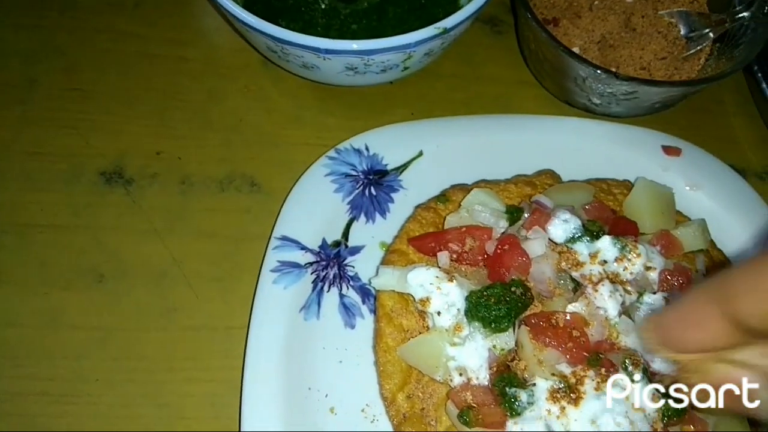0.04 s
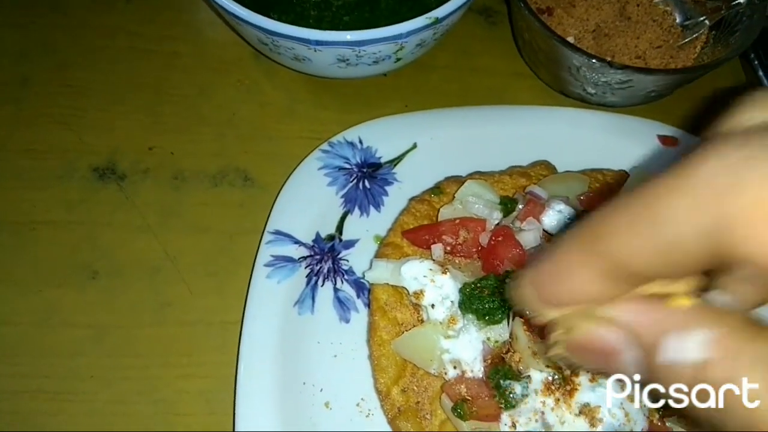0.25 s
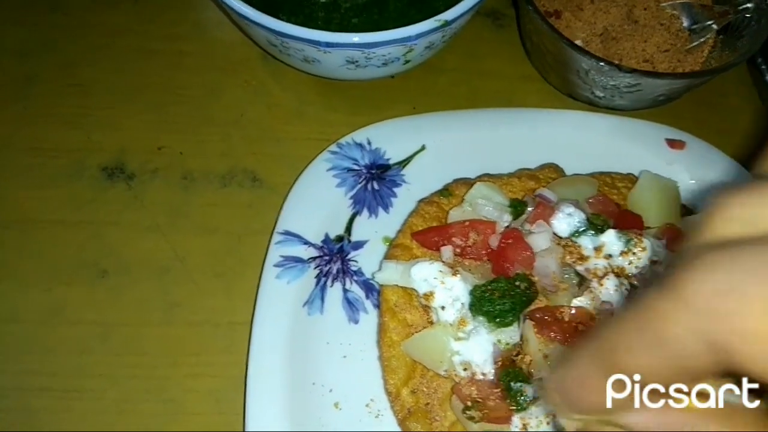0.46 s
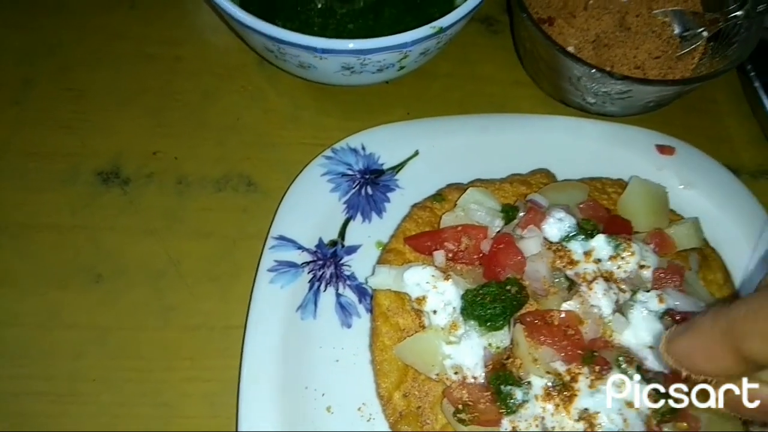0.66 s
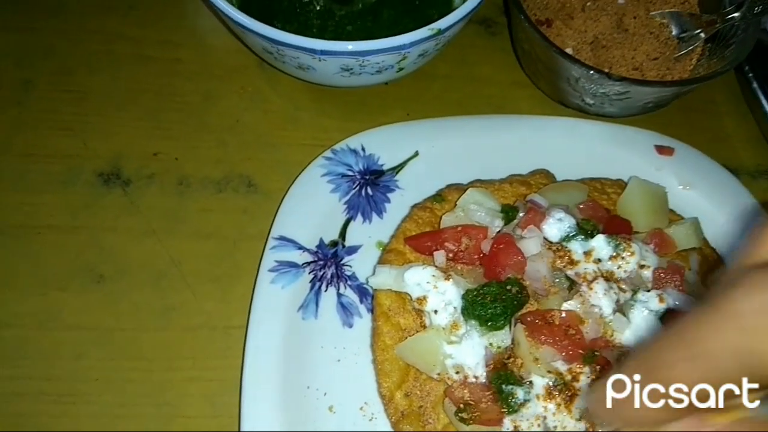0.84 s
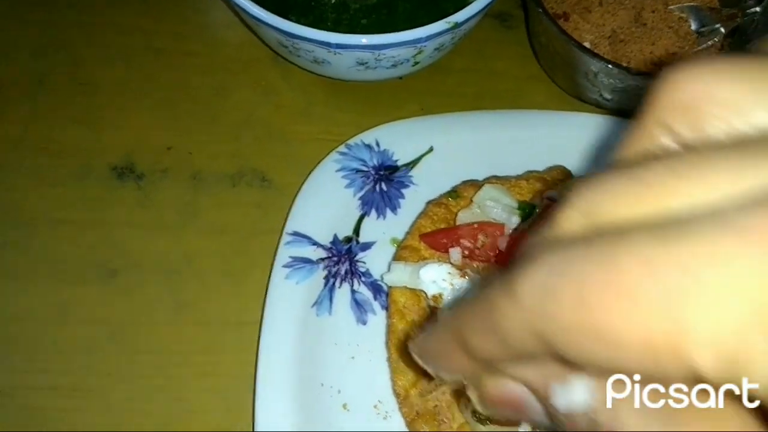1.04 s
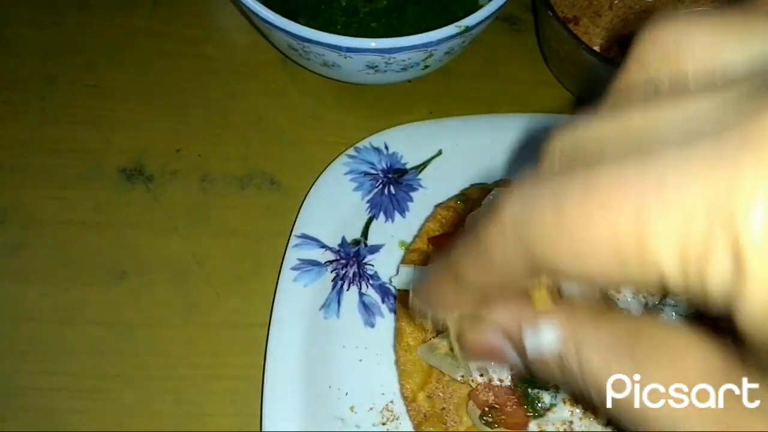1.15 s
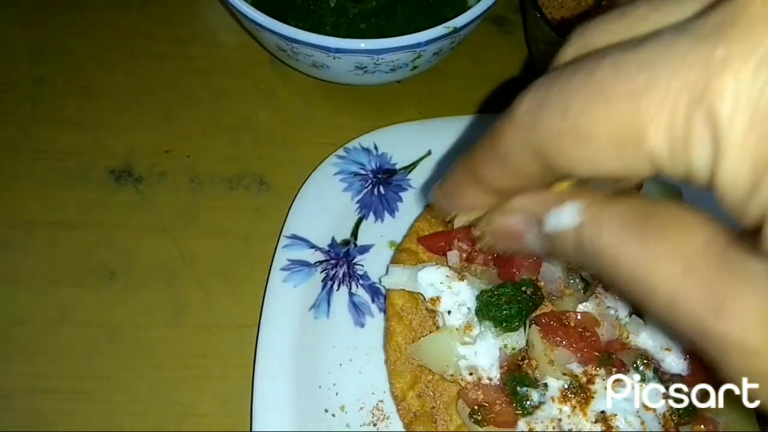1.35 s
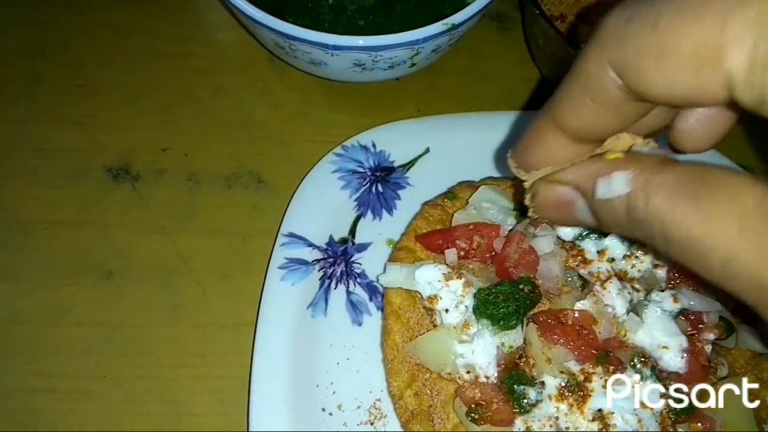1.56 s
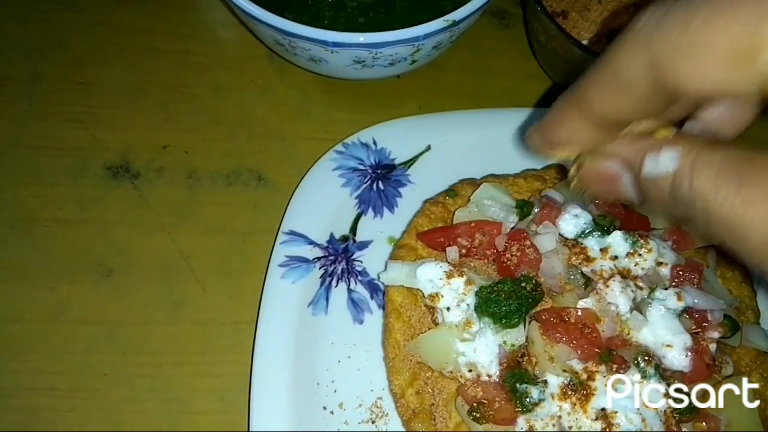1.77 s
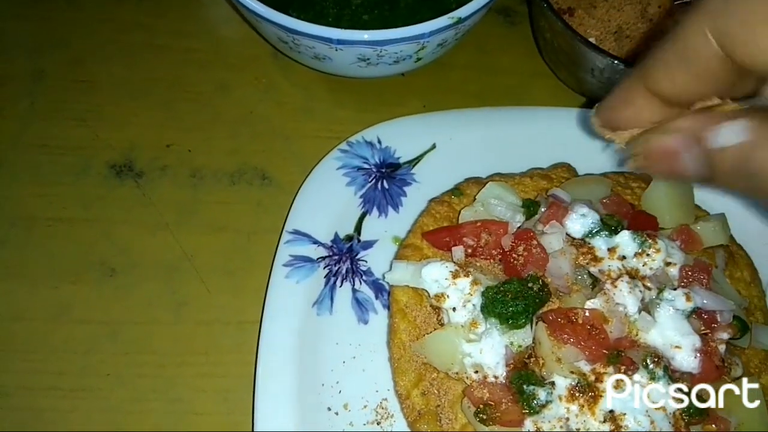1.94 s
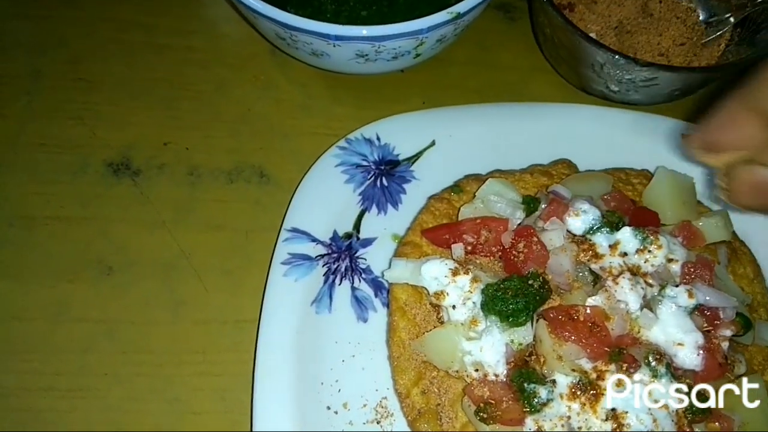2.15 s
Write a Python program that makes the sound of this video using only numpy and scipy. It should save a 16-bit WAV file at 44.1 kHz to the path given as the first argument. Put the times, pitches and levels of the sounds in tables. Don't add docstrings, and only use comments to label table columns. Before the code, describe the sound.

Close stereo phone pickup of spice being pinched and sprinkled, brighter on the right; a loud brittle crumble comes first, then light scrapes and powdery hisses, with faint hand puffs, dull knocks and quiet room tone.

```python
import sys
import numpy as np
from scipy import signal
from scipy.fft import rfft, irfft, next_fast_len
from scipy.io import wavfile
from scipy.ndimage import uniform_filter1d

SR = 44100
rng = np.random.default_rng(int(sys.argv[2]) if len(sys.argv) > 2 else 0)


def generate_wav(signal):
    frames = np.transpose(np.atleast_2d(signal))
    scaled = np.clip(frames, -1, 1) * 32767
    pcm = np.round(scaled).astype(np.int16)
    wavfile.write(sys.argv[1], SR, pcm)


def field_ratio(decibels):
    return 10 ** (np.asarray(decibels, dtype=float) / 20)


N = 97020

# frequency in Hz, level in dB per Hz.
KITCHEN_TONE = [(45, -17), (190, 1), (370, -5), (490, -16), (1000, -14), (2500, -28), (5000, -36),
                (9000, -35)]
KITCHEN_DB, KITCHEN_LEFT_DB, KITCHEN_SHARED, KITCHEN_SWELL_DB = -59, -12, .9, 1.5

# frequency in Hz, level in dB per Hz.
BREEZE_TONE = [(15, -44), (35, -22), (56, 0), (100, -5), (200, -30)]
BREEZE_DB, BREEZE_GUST_DB = -70, 2.5

# centre in seconds, peak in dB, frequency in Hz, length in seconds.
LEFT_PUFFS = [(0.022, -49, 60, 0.011), (0.051, -33, 70, 0.019), (0.29, -52, 94, 0.01),
              (0.687, -36, 84, 0.013), (0.728, -33, 97, 0.013), (0.763, -46, 65, 0.013),
              (0.803, -44, 66, 0.02), (0.825, -52, 80, 0.008), (0.921, -46, 67, 0.026),
              (0.952, -52, 79, 0.007), (0.998, -35, 63, 0.025), (1.019, -46, 51, 0.005),
              (1.686, -47, 55, 0.028), (1.707, -49, 61, 0.006), (1.927, -53, 86, 0.013),
              (2.037, -40, 63, 0.022)]
# centre in seconds, peak in dB, frequency in Hz, length in seconds.
RIGHT_PUFFS = [(0.107, -44, 79, 0.024), (0.143, -46, 65, 0.018), (0.17, -49, 56, 0.024),
               (0.291, -41, 68, 0.066), (0.315, -42, 64, 0.014), (0.342, -43, 64, 0.004),
               (0.622, -50, 104, 0.024), (0.669, -35, 71, 0.014), (0.691, -44, 62, 0.008),
               (0.706, -41, 60, 0.012), (0.747, -45, 79, 0.014), (0.957, -39, 71, 0.012),
               (0.999, -36, 65, 0.02), (1.041, -50, 66, 0.007), (1.077, -50, 78, 0.012),
               (1.292, -50, 93, 0.015), (2.175, -50, 77, 0.018)]

# peak in seconds, level in dB, 20 dB rise in seconds,
# 20 dB fall in seconds, centre in Hz.
FINGER_RUBS = [(.03, -62, .1, .08, 9000), (.2, -46, .07, .09, 12000), (.43, -46, .14, .06, 10500),
               (.56, -62, .08, .05, 9000), (.69, -60, .015, .1, 7500), (.782, -46, .02, .015, 10000),
               (.83, -61, .05, .1, 8000), (1.026, -53, .02, .03, 13000), (1.195, -38, .09, .07, 9000),
               (1.325, -41, .06, .12, 11000), (1.4, -43, .1, .055, 10500), (1.59, -49, .045, .03, 13000),
               (1.755, -52, .008, .12, 10000), (1.792, -33, .012, .01, 10000), (1.85, -47, .1, .1, 10500),
               (1.895, -46, .04, .05, 11000), (2.1, -58, .04, .1, 6000), (2.178, -38, .016, .025, 11500)]
RUB_OCTAVES, RUB_GRAIN_DB, RUB_FLUTTER_DB = .55, 2.2, 2.2
RUB_BODY_HZ, RUB_BODY_OCTAVES, RUB_BODY_DB = 3400, .8, -13

# peak in seconds, level in dB, 20 dB rise in seconds,
# 20 dB fall in seconds, centre in Hz.
FINE_RUBS = [(.1905, -35, .002, .003, 13500), (.2152, -33, .003, .003, 14000), (.516, -54, .004, .1, 10700),
             (.528, -48, .003, .004, 11300), (.556, -58, .006, .06, 8800), (.578, -55, .05, .02, 9800),
             (.674, -57, .004, .12, 6200), (.778, -46, .012, .01, 8300), (.776, -40, .02, .02, 13800),
             (1.744, -51, .003, .1, 10800), (1.745, -55, .003, .1, 7200), (2.097, -59, .01, .12, 5600),
             (2.06, -60, .04, .04, 6500), (2.09, -56, .08, .15, 13000), (.2522, -13, .003, .005, 7800),
             (1.2, -46, .08, .08, 12500), (1.198, -51, .04, .04, 6000), (1.32, -57, .03, .1, 5800),
             (1.33, -48, .04, .12, 12500), (1.025, -43, .04, .03, 13800), (1.59, -60, .04, .04, 6500),
             (.195, -58, .02, .05, 6000)]
FINE_OCTAVES, FINE_STEEP, FINE_LEFT_DB = .2, 3.5, -3

# start in seconds, level in dB, hold in seconds, body share in dB,
# left boost in dB.
CRUMBLES = [(.2298, -36, .003, -18, 6), (.2340, -13, .0008, -20, 8), (.2352, -20, .002, -15, 6),
            (.2417, -22, .002, -6, 10), (.2447, -16, .002, -12, 5), (.2492, -13, .0015, -14, 7),
            (.2508, -7, .004, -10, 7), (.2615, -17, .018, -8, 6), (.283, -22, .022, -8, 3),
            (.81, -75, .04, 15, -1), (2.092, -62, .05, 3, 5)]
# start in seconds, level in dB, hold in seconds, body share in dB,
# left boost in dB.
PLATE_SCRAPES = [
    (1.0338, -30, .004, 1, -2),
    (1.043, -30, .012, 0, -2),
    (1.057, -33, .014, 2, -2),
    (1.073, -37, .004, 4, -2),
    (1.0795, -37, .004, 5, -2),
    (1.095, -49, .03, 4, -1),
    (1.15, -62, .08, 6, -1),
    (1.745, -72, .06, 9, -1),
]
# start in seconds, level in dB, hold in seconds, body share in dB,
# left boost in dB.
RIM_DRAGS = [
    (1.9026, -27, .003, -11, 0),
    (1.907, -36, .006, -8, 0),
    (1.914, -32.5, .025, -5, 0),
    (1.94, -34, .04, -12, 1),
    (1.982, -40, .018, -13, 1),
    (2.003, -39, .004, -10, 1),
    (2.008, -43, .018, -12, 1),
]
SNAP_RELEASE_S, SNAP_GRAIN_DB, SNAP_FLUTTER_DB, SNAP_EDGE_HZ = .0015, 1.5, 1.5, 4600

# frequency in Hz, width in Hz, level in dB.
FOOD_RING = [(370, 80, -11), (1600, 700, -15), (2600, 450, 1), (3150, 350, 0), (3800, 500, 0),
             (4400, 400, -4)]
# frequency in Hz, width in Hz, level in dB.
PLATE_RING = [(400, 150, -17), (780, 200, -14), (1400, 600, -20), (2020, 190, 5), (2480, 350, 0),
              (3080, 300, -13), (4030, 300, -9)]
# frequency in Hz, width in Hz, level in dB.
RIM_RING = [(730, 200, -16), (2160, 330, 3), (2550, 300, -2), (3090, 400, -5), (4100, 700, -6)]

# start in seconds, level in dB, frequency in Hz, T60 in seconds.
TABLE_KNOCKS = [
    (1.042, -29, 770, .04),
    (1.073, -37, 375, .08),
    (1.925, -31, 740, .03),
    (1.927, -37, 520, .03),
    (.57, -50, 750, .08),
    (.2506, -37, 370, .06),
    (.66, -48, 190, .15),
    (.49, -49, 250, .15),
    (.815, -49, 200, .2),
]

ROOM_DB, ROOM_T60_S, ROOM_TREBLE_T60_S, ROOM_GAP_S = -3, .25, .22, .003

# frequency in Hz, gain in dB.
LEFT_PORT = [(300, -12), (3000, -13), (5000, -20), (7000, -21), (9000, -17), (11000, -15), (13500, -7),
             (15500, -9)]
# frequency in Hz, gain in dB.
RIGHT_PORT = [(300, -1), (3000, -1), (4700, -7), (6000, -1), (8600, 4), (10000, 1), (11500, -6),
              (15000, -6)]
LEFT_LAG_S, PORTS_SHARED = .00016, .65

# frequency in Hz, handicap in dB.
WEAK_BANDS = [(2600, -3), (4550, -1), (4800, 11), (5050, -1), (12500, 4), (14600, 2), (15200, 12)]
MASK_DB, MASK_CHANCE_DB, MASK_FROM_HZ, MASK_DEPTH_DB = -30, 12, 2600, -35
MASK_LEFT_DB = 7
TOP_HZ = 15400


def unit(x):
    return x / np.sqrt(np.mean(x ** 2))


def freqs(size):
    return np.maximum(np.arange(size // 2 + 1) * SR / size, 1)


def near(s, before, after):
    first = max(int((s - before) * SR), 0)
    k = np.arange(first, min(int((s + after) * SR), N))
    return slice(k[0], k[-1] + 1), k / SR - s


def colour(x, points):
    hz, db = np.array(points).T
    gain = field_ratio(np.interp(np.log(freqs(N)), np.log(hz), db))
    return irfft(rfft(x) * gain, N)


def bump(f, hz, octaves, steep):
    return np.exp(-.5 * abs(np.log2(f / hz) / octaves) ** steep)


def walk(rate):
    k = int(SR / rate)
    held = rng.standard_normal(N // 20)[np.arange(N) // k]
    return unit(uniform_filter1d(held, k))


def kitchen():
    shared, own = rng.standard_normal(N), rng.standard_normal((2, N))
    mixed = np.sqrt(KITCHEN_SHARED) * shared + np.sqrt(1 - KITCHEN_SHARED) * own
    tone = unit(colour(mixed, KITCHEN_TONE))
    return tone * field_ratio(KITCHEN_DB + KITCHEN_SWELL_DB * walk(6) + np.array([[KITCHEN_LEFT_DB], [0]]))


def breeze():
    out = []
    for _ in range(2):
        rumble = unit(colour(rng.standard_normal(N), BREEZE_TONE))
        out.append(rumble * field_ratio(BREEZE_DB + BREEZE_GUST_DB * walk(12)))
    return np.array(out)


def puffs(table):
    out = np.zeros(N)
    for s, db, hz, length in table:
        at, t = near(s, 2 * length + .02, 2 * length + .02)
        swing = np.sin(2 * np.pi * .95 * hz * t + .8)
        out[at] += field_ratio(db + .6) * swing * np.exp(-2.8 * (t / (length + .003)) ** 2)
    return out


def grains(spread_db, flutter_db, rate):
    clicks = rng.standard_normal(N)
    size_db = spread_db * rng.exponential(size=N)
    return unit(clicks * field_ratio(size_db + flutter_db * walk(rate)))


def ports(spread_db, flutter_db, rate):
    right = grains(spread_db, flutter_db, rate)
    own = grains(spread_db, flutter_db, rate)
    left = np.sqrt(PORTS_SHARED) * right + np.sqrt(1 - PORTS_SHARED) * own
    return np.array([left, right])


def rubs(table, octaves, steep, body_db, left_db):
    grit, out = ports(RUB_GRAIN_DB, RUB_FLUTTER_DB, 90), np.zeros((2, N))
    for s, db, rise, fall, hz in table:
        at, t = near(s, 2 * rise, 2 * fall)
        size = next_fast_len(len(t), True)
        f = freqs(size)
        body = field_ratio(body_db) * bump(f, RUB_BODY_HZ, RUB_BODY_OCTAVES, 2)
        gain = unit(bump(f, hz, octaves, steep) + body)
        hiss = irfft(rfft(grit[:, at], size) * gain, size)[:, :len(t)]
        out[:, at] += hiss * field_ratio(db - 20 * np.maximum(-t / rise, t / fall))
    return out * field_ratio(np.array([[left_db], [0]]))


def ring(x, hz, width):
    return signal.lfilter(*signal.iirpeak(hz, hz / width, SR), x)


def snaps(table, modes):
    grit = ports(SNAP_GRAIN_DB, SNAP_FLUTTER_DB, 250)
    edge, body = np.zeros((2, N)), np.zeros((2, N))
    for s, db, hold, body_db, left_db in table:
        at, t = near(s, 0, hold + 10 * SNAP_RELEASE_S)
        release = np.exp(-np.maximum(t - hold, 0) / SNAP_RELEASE_S)
        shape = release * field_ratio(db + np.array([[left_db], [0]]))
        edge[:, at] += shape
        body[:, at] += shape * field_ratio(body_db)
    high = signal.butter(3, SNAP_EDGE_HZ, "high", fs=SR, output="sos")
    struck = grit[:, ::-1] * body
    rung = np.zeros((2, N))
    for k, (hz, width, db) in enumerate(modes):
        rung += (-1) ** k * field_ratio(db) * ring(ring(struck, hz, 2 * width), hz, width)
    return signal.sosfilt(high, grit * edge) + field_ratio(11) * rung


def knocks():
    out = np.zeros(N)
    for s, db, hz, t60 in TABLE_KNOCKS:
        at, t = near(s, 0, t60)
        onset = 1 - np.exp(-t / .002)
        out[at] += np.sin(2 * np.pi * hz * t) * onset * field_ratio(db - 60 * t / t60)
    return out


def room(x):
    t = np.arange(SR // 2) / SR
    noise = rng.standard_normal((2, len(t))) * (t > ROOM_GAP_S)
    low = signal.sosfilt(signal.butter(2, 5000, fs=SR, output="sos"), noise)
    tail = low * field_ratio(-60 * t / ROOM_T60_S) + (noise - low) * field_ratio(-60 * t / ROOM_TREBLE_T60_S)
    tail = unit(tail) / np.sqrt(len(t))
    return x + field_ratio(ROOM_DB) * signal.fftconvolve(x, tail, axes=1)[:, :N]


def scene():
    powder = rubs(FINGER_RUBS, RUB_OCTAVES, 2, RUB_BODY_DB, 0)
    powder += rubs(FINE_RUBS, FINE_OCTAVES, FINE_STEEP, -25, FINE_LEFT_DB)
    cracks = snaps(CRUMBLES, FOOD_RING) + snaps(PLATE_SCRAPES, PLATE_RING) + snaps(RIM_DRAGS, RIM_RING)
    left, right = room(powder + cracks + knocks())
    left = np.roll(left, int(LEFT_LAG_S * SR))
    air = np.array([puffs(LEFT_PUFFS), puffs(RIGHT_PUFFS)]) + breeze()
    return np.array([colour(left, LEFT_PORT), colour(right, RIGHT_PORT)]) + air + kitchen()


def thin(x):
    f, _, z = signal.stft(x, SR, nperseg=2048)
    band = np.arange(len(f)) // 8
    centre = f[4::8]
    power = uniform_filter1d(abs(z) ** 2, size=8, axis=1)[:, 4::8]
    db = 10 * np.log10(power + 1e-18)
    db[:, centre < MASK_FROM_HZ] = np.nan
    db -= np.interp(centre, *np.array(WEAK_BANDS).T)[:, None]
    chance = unit(uniform_filter1d(rng.standard_normal(db.shape), size=5, axis=2))
    limit = MASK_DB + np.array([MASK_LEFT_DB, 0])[:, None, None] + MASK_CHANCE_DB * chance
    drop = db - np.nanmax(db, axis=(0, 1), keepdims=True) < limit
    gain = np.where(drop, field_ratio(MASK_DEPTH_DB), 1)
    z = z * gain[:, np.minimum(band, db.shape[1] - 1)]
    return signal.istft(z, SR, nperseg=2048)[1][:, :N]


def top_cut(x):
    return signal.sosfilt(signal.butter(12, 16640, fs=SR, output="sos"), x)


def record(dry):
    low_pass = signal.ellip(8, .2, 35, TOP_HZ, fs=SR, output="sos")
    cut = signal.sosfilt(low_pass, thin(dry))
    return top_cut(np.clip(cut, -1, 1))


dry = scene()
out = record(dry)
generate_wav(out)
```